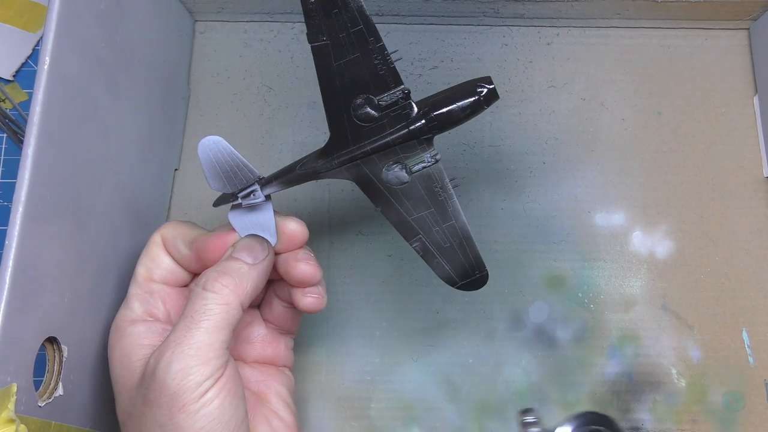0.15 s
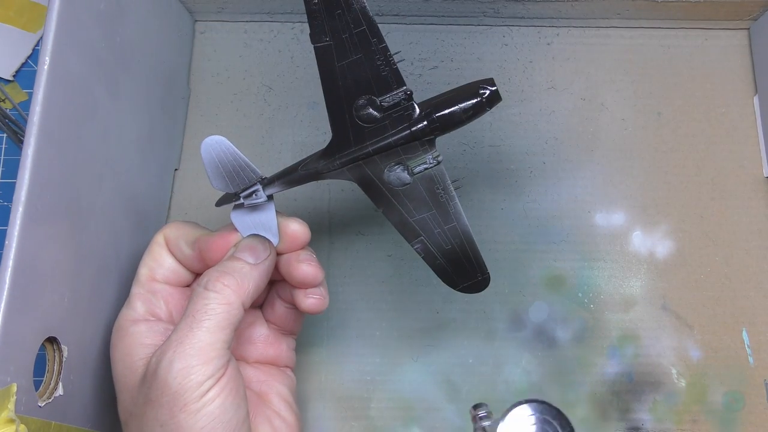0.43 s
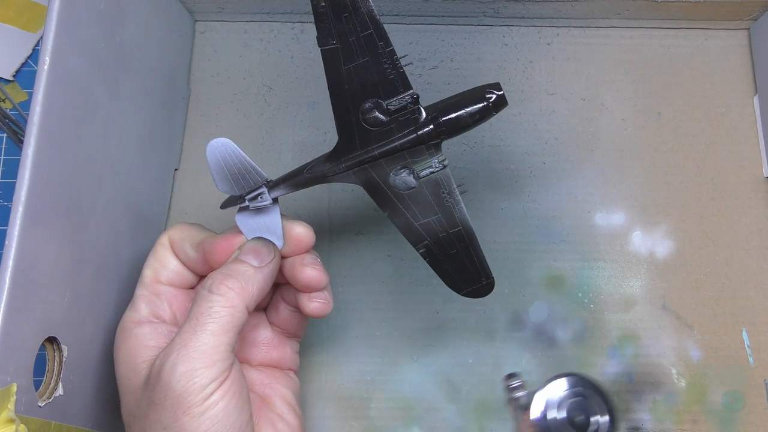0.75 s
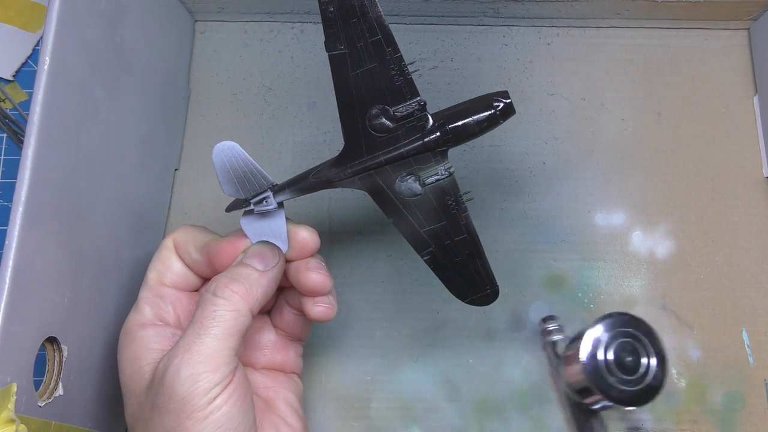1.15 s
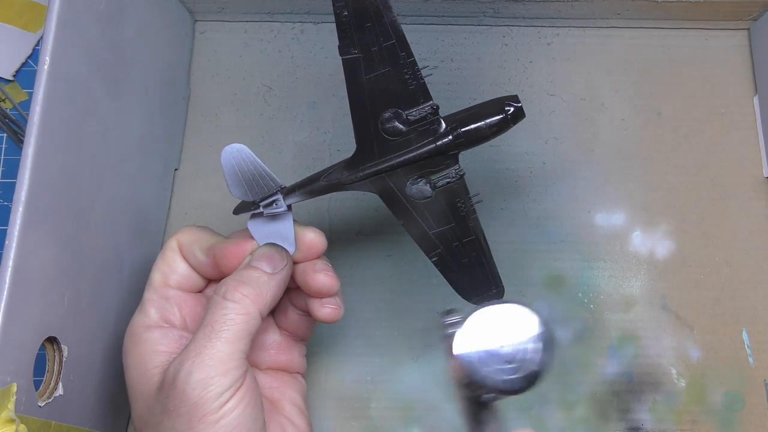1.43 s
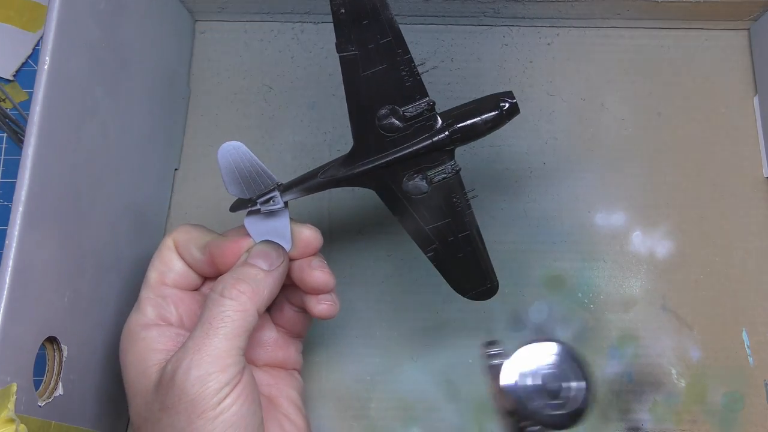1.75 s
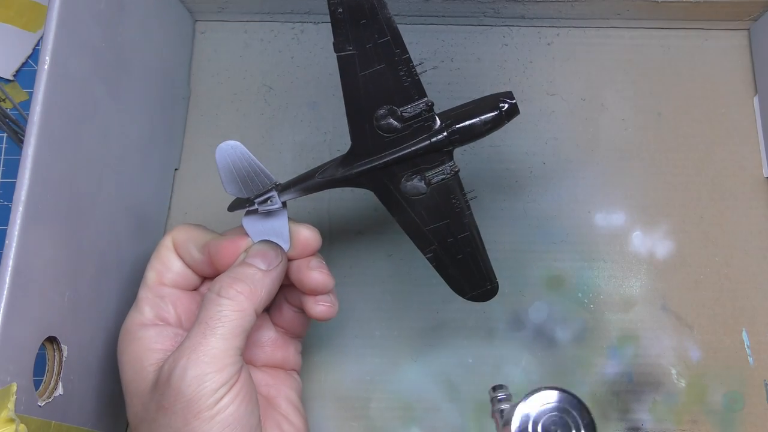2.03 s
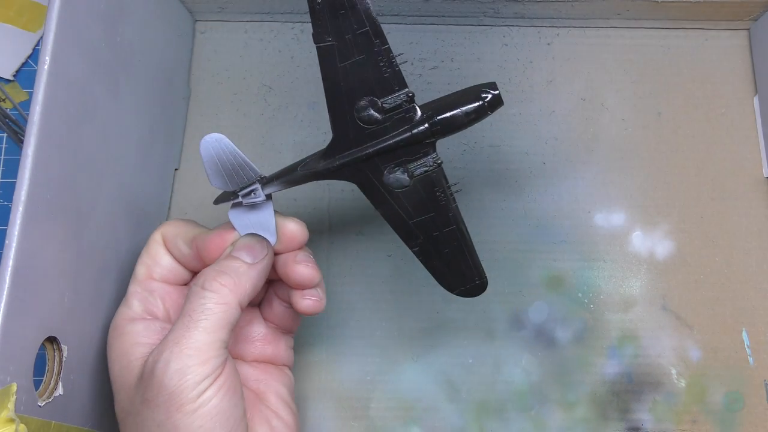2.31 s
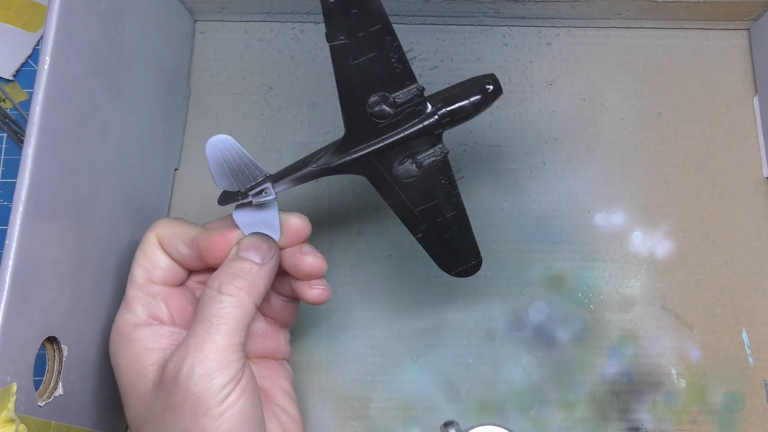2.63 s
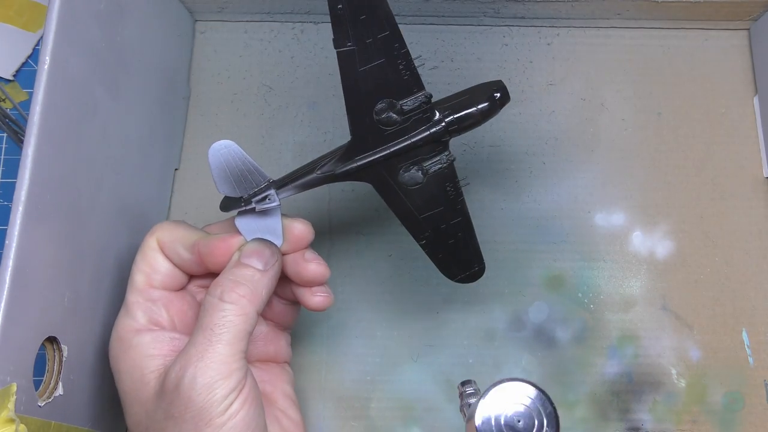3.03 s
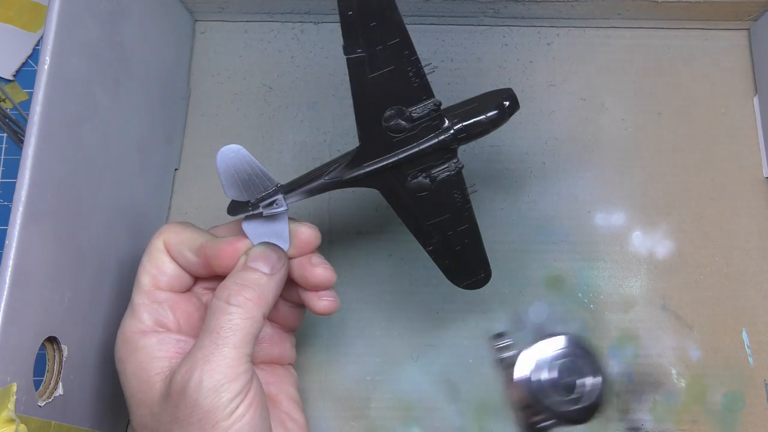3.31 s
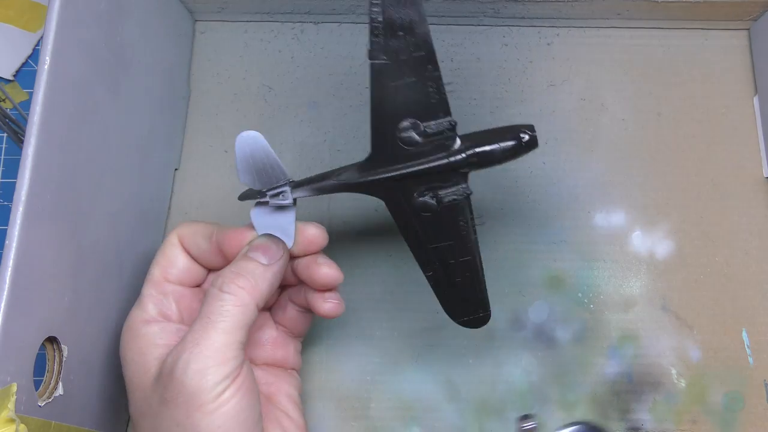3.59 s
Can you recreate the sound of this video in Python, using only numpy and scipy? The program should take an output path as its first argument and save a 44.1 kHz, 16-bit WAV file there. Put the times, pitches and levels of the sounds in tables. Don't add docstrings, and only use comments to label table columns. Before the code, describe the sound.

An airbrush hisses brightly close to the microphone in a cardboard spray booth, one long spray then two shorter ones, gusting low as it sweeps the model, over faint fan noise, with a dull knock at the end.

```python
import sys
import numpy as np
from scipy import signal
from scipy.fft import rfft, irfft, next_fast_len
from scipy.io import wavfile
from scipy.ndimage import uniform_filter1d

SR = 44100
rng = np.random.default_rng(int(sys.argv[2]) if len(sys.argv) > 2 else 0)


def persist_wave(psi):
    counts = np.round(np.clip(psi, -1, 1) * 32767).astype(np.int16)
    wavfile.write(sys.argv[1], SR, np.atleast_2d(counts).T)


def ratio(d):
    e = np.asarray(d, float) / 20
    return 10 ** e


N = 165375


def evened(x):
    return x / np.sqrt(np.mean(np.abs(x) ** 2) + 1e-20)


def read(points, hz):
    f, value = np.transpose(points)
    return np.interp(np.log(hz + 1), np.log(f + 1), value)


def slow(t, top_hz, count=24):
    hz = np.geomspace(top_hz / 12, top_hz, count)
    sines = np.sin(2 * np.pi * (hz * t[:, None] + rng.random(count)))
    return evened(sines @ hz ** -.5)


def coloured(spectrum):
    hz = np.fft.rfftfreq(N, 1 / SR)
    white = rfft(rng.standard_normal((2, N)))
    return evened(irfft(white * ratio(read(spectrum, hz)), N))


def ramp(start_s, length_s):
    done = np.clip((np.arange(N) / SR - start_s) / length_s, 0, 1)
    return np.sin(np.pi / 2 * done) ** 2


def smooth_twice(x, samples):
    return uniform_filter1d(uniform_filter1d(x, size=samples), size=samples)


def left_only(tone):
    return np.array([[1], [0]]) * tone


def glide(curve, overtone_db):
    t = np.arange(N) / SR
    time_s, pitch_hz, level_db = np.transpose(curve)
    phase = 2 * np.pi * np.cumsum(np.interp(t, time_s, pitch_hz)) / SR
    wave = np.sin(phase) + ratio(overtone_db) * np.sin(2 * phase)
    tone = np.sqrt(2) * wave * ratio(np.interp(t, time_s, level_db))
    return left_only(tone) * ramp(time_s[0], 0.0086) * (1 - ramp(time_s[-1] - .01, .01))


# [pitch_hz, level_db per Hz]
BENCH_SPECTRUM = [(45, -2), (70, -4), (120, -44)]


def bench_rumble(level_db=-58, end_s=3.28):
    return ratio(level_db) * coloured(BENCH_SPECTRUM) * (1 - ramp(end_s, .05))


# [pitch_hz, level_db per Hz]
FAN_SPECTRUM = [(20, -13), (142, -1), (300, -7), (800, -18.5), (1570, -17), (2800, -25.5), (3600, -33),
                (16000, -36.5)]
# [pitch_hz, width_hz, level_db]
FAN_HUMS = [(143.4, 22, -52.5), (208, 47, -57.5), (956, 42, -63), (1755, 96, -61), (2720, 50, -73)]


def fan(level_db=-51, steady=0.6):
    hz = np.fft.rfftfreq(N, 1 / SR)
    out = ratio(level_db) * coloured(FAN_SPECTRUM)
    for pitch_hz, width_hz, hum_db in FAN_HUMS:
        white = rfft(rng.standard_normal((2, N)))
        hum = evened(irfft(white / (1 + ((hz - pitch_hz) / width_hz * 2) ** 2), N))
        power = smooth_twice(hum ** 2, 1200)
        out = out + ratio(hum_db) * evened(hum / (power + .05) ** (steady / 2))
    return out


# [time_s, pitch_hz, level_db]
RUMBLE = [
    (.67, 62, -58),
    (.695, 57, -45.5),
    (.72, 49.4, -44.5),
    (.755, 44, -45.5),
    (.79, 42.3, -42),
    (.865, 43.3, -38),
    (.9, 42.7, -56),
    (.99, 42.4, -52),
    (1.04, 43, -59.5),
]


def passing_rumble():
    return glide(RUMBLE, -22.0)[0] * ratio(np.array([[.1], [-.1]]))


# [start_s, level_db, pitch_hz]
TAPS = [
    (3.03, -36, 260),
    (3.041, -33, 201),
    (3.533, -36, 202.5),
]


def taps(t60_s=0.04):
    t = np.arange(N) / SR
    rings = 0
    for start_s, level_db, pitch_hz in TAPS:
        since_s = np.maximum(t - start_s, 0)
        rings = rings + ratio(level_db - 60 * since_s / t60_s) * np.sin(2 * np.pi * pitch_hz * since_s)
    return left_only(rings)


# [time_s, level_db]
SCRAPE = [
    (3.535, -70),
    (3.562, -49),
    (3.575, -46),
    (3.585, -45),
    (3.594, -41),
    (3.6, -45),
    (3.607, -70),
]
# [pitch_hz, level_db per Hz]
SCRAPE_SPECTRUM = [(200, -2.5), (500, 2), (1000, -28), (1200, 6), (1400, -4), (3800, -8), (5500, -16.5),
                   (16000, -22)]


def scrape():
    level_db = np.interp(np.arange(N) / SR, *np.transpose(SCRAPE), left=-200, right=-200)
    return coloured(SCRAPE_SPECTRUM) * ratio(level_db)


# [time_s, pitch_hz, level_db]
KNOCK = [
    (3.574, 234, -56),
    (3.582, 240, -32),
    (3.593, 243, -33.5),
    (3.61, 245, -34.5),
    (3.622, 240, -46),
    (3.64, 235, -62),
]


def knock():
    return glide(KNOCK, -26.0)


# [start_s, end_s, level_db]
BLOWS = [
    (-.1, 1.177, -45.5),
    (1.18, 1.22, -51),
    (1.223, 2.324, -45),
    (2.33, 2.376, -54.5),
    (2.696, 2.965, -46),
    (3.062, 3.47, -48),
]
# [pitch_hz, level_db per Hz]
BLOW_SPECTRUM = [(120, -24), (250, 4), (480, -1.5), (800, -4.5), (1200, -5), (2000, -15.5), (3500, -12.5),
                 (6000, -35)]
# [time_s, level_db, width_s]
GUSTS = [(0.07, -47, 0.12), (0.263, -42.5, 0.051), (0.368, -39.5, 0.045), (0.517, -40.5, 0.07),
         (0.629, -36.5, 0.026), (0.696, -43, 0.059), (0.77, -38.5, 0.027), (0.832, -41, 0.051),
         (0.994, -41, 0.13), (1.063, -41.5, 0.034), (1.14, -39.5, 0.052), (1.345, -39.5, 0.12),
         (1.43, -39, 0.044), (1.692, -39, 0.055), (1.77, -35.5, 0.039), (1.849, -40, 0.038),
         (1.906, -37, 0.039), (2.026, -38, 0.038), (2.176, -39, 0.029), (2.264, -39.5, 0.019),
         (2.872, -42, 0.12), (3.096, -38.5, 0.039), (3.23, -37.5, 0.035), (3.396, -43.5, 0.088),
         (1.25, -41, 0.038), (1.97, -41.5, 0.024), (2.1, -45.5, 0.11), (2.315, -41, 0.019),
         (2.765, -41.5, 0.078), (2.057, -39.5, 0.022), (2.137, -38.5, 0.015), (2.225, -43.5, 0.014),
         (0.16, -44, 0.03), (0.487, -41, 0.013), (1.615, -45.5, 0.027)]
# [pitch_hz, level_db per Hz]
GUST_SPECTRUM = [(150, -16.5), (280, -1.5), (560, -0.5), (800, -3), (1200, -9.5), (2500, -13.5),
                 (6000, -24)]


def buffet(lumps_db=1.5, edge_s=0.0075, steady=0.56):
    t = np.arange(N) / SR
    blow_power, gust_power = 0, 0
    for start_s, end_s, level_db in BLOWS:
        blow_power = blow_power + ratio(2 * level_db) * ramp(start_s, edge_s) * (1 - ramp(end_s, edge_s))
    for time_s, level_db, width_s in GUSTS:
        shape = np.exp(-(2.07 * (t - time_s) / np.clip(width_s, .01, .085)) ** 2)
        gust_power = gust_power + ratio(2 * level_db) * shape
    lumps = ratio(lumps_db * evened(uniform_filter1d(rng.standard_normal(N), size=300)))
    out = 0
    for spectrum, power in ((BLOW_SPECTRUM, blow_power), (GUST_SPECTRUM, gust_power)):
        rush = coloured(spectrum) * lumps
        drift = smooth_twice(rush[0] ** 2, 900)
        out = out + evened(rush / drift ** (steady / 2)) * np.sqrt(1.2 * power)
    return out


# [time_s, pitch_hz, level_db]
WHINE = [
    (2.325, 1134, -66),
    (2.35, 1134, -56),
    (2.39, 1134, -57),
    (2.41, 1134, -68),
]


def whine():
    return glide(WHINE, -40.0)


# [pitch_hz, level_db per Hz]
SPIT_SPECTRUM = [(2000, -23), (3000, 1), (4000, -10), (5000, 1), (6200, -4), (7500, -15), (16000, -25)]


def spit(time_s=3.068, level_db=-35.5, width_s=0.0039):
    burst = np.exp(-((np.arange(N) / SR - time_s) / width_s) ** 2)
    return coloured(SPIT_SPECTRUM) * ratio(level_db) * burst


# [press_s, full_open_s, release_s, closing_s, jet_db]
SPRAYS = [
    (-.2, -.1, 2.392, 0.0092, -27.5),
    (2.686, 2.784, 2.961, 0.021, -27),
    (3.059, 3.105, 3.47, 0.013, -26.5),
]
# [bleed_hold_s, bleed_db, pop_db, opening_s]
VALVE = [
    (0.012, -13.5, -60, .012),
    (0.001, -21, -64, .012),
    (0.0022, -20, -36, .045),
]
# [time_s, nearness_db, aim_db (middle of the hiss)]
NOZZLE = [(0, -1.5, 1.5), (.3, 0, 1.5), (.6, 0, 0.5), (.9, 0.5, 1.5), (1.2, -0.5, 2), (1.5, 1, 2),
          (1.75, 0.7, 1), (2.0, 0, 0.5), (2.2, 0, 1.5), (2.39, -1.5, 2), (2.7, -0.5, 2), (2.8, -0.5, 2.5),
          (2.95, -0.5, 5), (3.07, 0.5, -1), (3.2, 0.5, 1.5), (3.47, -0.5, 0)]


def trigger(press_s=0.014, open_s=0.012, half_db=-6.5, bleed_t60_s=0.067, room_db=-26, room_t60_s=0.34):
    t, gain = np.arange(N) / SR, np.zeros(N)
    for pull, valve in zip(SPRAYS, VALVE):
        start_s, full_s, release_s, closing_s, jet_db = pull
        hold_s, bleed_db, pop_db, opening_s = valve
        half_open_db = half_db * (1 - ramp(full_s - open_s, opening_s))
        opening = ramp(start_s, press_s) * ratio(half_open_db)
        bleeding_s = np.maximum(t - release_s - closing_s - hold_s, 0)
        bleed = ratio(bleed_db - 60 * bleeding_s / bleed_t60_s)
        room = ratio(room_db - 60 * (t - release_s) / room_t60_s)
        tail = (bleed + room) * (t > release_s)
        gain += ratio(jet_db) * opening * np.maximum(1 - ramp(release_s, closing_s), tail)
        gain += ratio(pop_db) * np.exp(-((t - start_s - .009) / 0.0017) ** 2)
    return gain * ratio(np.interp(t, *np.transpose(NOZZLE)[:2]))


# [pitch_hz, level_db per Hz]
JET_SPECTRUM = [(1200, -14), (2760, -8), (3620, -8), (6800, -4.5), (8000, -3), (9930, 0.5), (12500, -1),
                (16000, -3)]
# [delay_ms, strength, drift_ms]
WALLS = [(0.382, 0.03, 0.061), (.8, 0.077, 0.096), (1.18, 0.034, 0.091), (1.68, 0.046, 0.059),
         (2.4, 0.14, 0.073)]
# [pitch_hz, width_hz, level_db]
BOOTH = [(2030, 80, 3), (2800, 150, 2), (3300, 120, 2), (4030, 170, 2.5), (4800, 100, 1.5), (5080, 150, -1),
         (6030, 120, 1.5), (6900, 250, 2.5), (7480, 200, -2), (8720, 80, 1.5), (9350, 300, 1),
         (11080, 250, -2), (12000, 250, 1.5), (13300, 200, 1.5), (14550, 250, -1.5)]
# [time_s, half_length_s, pitch_hz, level_db]
RINGS = [(0.0, 0.072, 6600, -4), (0.0, 0.08, 12300, 5.5), (0.0, 0.18, 9560.0, -2), (0.0, 0.18, 13610.0, 8),
         (0.0, 0.43, 4860, -5), (0.0, 0.32, 5340.0, -3), (0.0, 0.25, 6100, -1), (0.0, 0.22, 7600, -1),
         (0.0, 0.29, 9130.0, 3.5), (0.0, 0.25, 10900, 4.5), (0.21, 0.25, 10420.0, -6),
         (0.33, 0.27, 9760, 6.5), (0.6, 0.14, 11630.0, 4.0), (0.66, 0.21, 8220, 3), (0.75, 0.18, 8800, 1.5),
         (0.86, 0.13, 5830, 3), (0.91, 0.12, 12750.0, -6), (0.91, 0.2, 3060, 1.5),
         (0.97, 0.098, 10060, 4.5), (1.0, 0.25, 14990.0, -5.0), (1.02, 0.12, 11500, -9),
         (1.28, 0.088, 13600, 9), (1.28, 0.23, 5340, 5.5), (1.31, 0.25, 8800, -4.0),
         (1.47, 0.18, 8100.0, -8), (1.49, 0.33, 3440, -4.0), (1.52, 0.2, 12700, 5.5),
         (1.53, 0.21, 6440, 4.0), (1.67, 0.12, 13950.0, -3), (1.81, 0.15, 10360, 4.5),
         (1.92, 0.099, 5900, 4.5), (1.96, 0.2, 7940, 1), (1.98, 0.13, 11800.0, -4.5),
         (2.08, 0.18, 8790.0, 5), (2.1, 0.2, 6980.0, 3), (2.74, 0.087, 3920, -10),
         (2.74, 0.08, 15070.0, 10), (2.82, 0.18, 8960.0, -3), (2.85, 0.12, 10700, 5.5),
         (2.88, 0.15, 2300, -5.0), (2.89, 0.21, 7000, -5), (2.91, 0.13, 11540.0, 9),
         (3.11, 0.08, 14470.0, 7.5), (3.33, 0.12, 15160.0, 4.5), (3.35, 0.12, 12490.0, 5.5),
         (3.4, 0.11, 2520, -6.0), (3.4, 0.11, 3300, -6.0), (3.43, 0.08, 5400, 10)]


def jet(patch_db=1.3, flicker_db=0.26, swell_db=0.44, ring_width_hz=195, ring_top_db=6.5,
        aim_hz=4130, aim_octaves=0.29):
    frames, hz = N // 128 + 5, np.fft.rfftfreq(512, 1 / SR)[:, None]
    t = np.arange(frames) * 128 / SR
    a, b, c, d, patches = rng.standard_normal((frames, 257, 5)).T
    patches = uniform_filter1d(patches, size=2, axis=0)
    patches = evened(uniform_filter1d(patches, size=90, axis=1))

    comb = 1
    for delay_ms, strength, drift_ms in WALLS:
        moving_s = (delay_ms + drift_ms * slow(t, 1.175)) / 1000
        comb = comb + strength * np.exp(-2j * np.pi * hz * moving_s)
    rings = 0
    for time_s, half_s, pitch_hz, level_db in RINGS:
        band = np.exp(-((hz - pitch_hz) / ring_width_hz) ** 2)
        rings = rings + min(level_db, ring_top_db) * band * np.exp(-((t - time_s) / half_s) ** 2)
    booth = sum(db * np.exp(-((hz - f) / width) ** 2) for f, width, db in BOOTH)
    below = -14 * np.maximum(np.log2(JET_SPECTRUM[0][0] * 1.05 / (hz + 1)), 0)
    aim_band = np.exp(-(np.log2((hz + 1) / aim_hz) / aim_octaves) ** 2)
    aim = np.interp(t, *np.transpose(NOZZLE)[::2]) * aim_band

    colour_db = read(JET_SPECTRUM, hz) + below + booth + aim + rings + patch_db * patches
    z = np.array([a + 1j * b, c + 1j * d]) * comb * ratio(colour_db)
    hiss = signal.istft(z, nperseg=512, noverlap=384)[1][:, :N]
    flicker = evened(uniform_filter1d(rng.standard_normal(N), size=60))
    swell = np.interp(np.arange(N) / SR, t, slow(t, 29.65))
    return evened(hiss * ratio(flicker_db * flicker + swell_db * swell)) * trigger()


# [pitch_hz, likeness (0-1)]
LIKENESS = [(40, .62), (130, .97), (500, .98), (1400, .8), (2600, .86), (4400, .84), (5600, .96),
            (9500, .86), (15000, .66)]
# [pitch_hz, lead_rad]
RIGHT_LEAD = [(25, .5), (130, 2.1), (260, 1.6), (690, .95), (1640, .6), (2100, .15), (9000, 0),
              (13000, -.2)]
# [pitch_hz, left_minus_right_db]
BALANCE = [(60, 2.5), (130, 3.5), (290, 1.5), (640, -0.5), (1410, -2.5), (3100, -4), (6820, -0.5),
           (15000, -1.5)]


def ports(pair, share=1):
    size = next_fast_len(N + 8192)
    hz, (a, b) = np.fft.rfftfreq(size, 1 / SR), rfft(pair, size)
    same = np.clip(share * read(LIKENESS, hz), 0, 1)
    tilt = ratio(read(BALANCE, hz) / 2)
    turn = np.exp(.5j * read(RIGHT_LEAD, hz))
    left = a * tilt / turn
    right = (same * a + np.sqrt(1 - same ** 2) * b) * turn / tilt
    return irfft(np.array([left, right]), size)[:, :N]


def scene():
    background = ports(fan() + bench_rumble(), 0.71)
    near = taps() + scrape() + knock() + buffet() + whine() + spit() + jet()
    return background + passing_rumble() + ports(near)


def roll_off(x):
    return signal.sosfilt(signal.butter(12, 16200, fs=SR, output="sos"), x)


def record(dry, edge_hz=15780, edge_width_hz=32):
    size = next_fast_len(N + 8192)
    hz = np.fft.rfftfreq(size, 1 / SR)
    cut_db = -np.clip(10 * (hz - edge_hz) / edge_width_hz, 0, 90)
    limited = irfft(rfft(dry, size) * ratio(cut_db), size)[:, :N]
    return roll_off(limited)


dry = scene()
out = record(dry)
persist_wave(out)
```